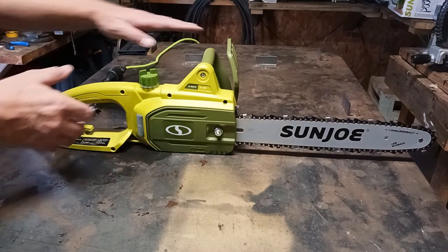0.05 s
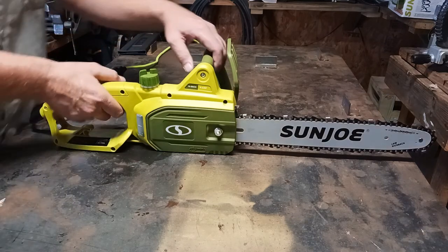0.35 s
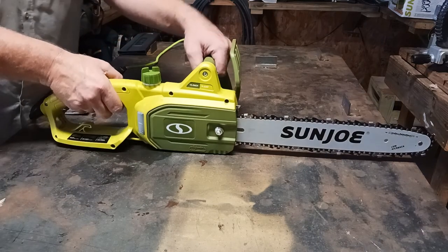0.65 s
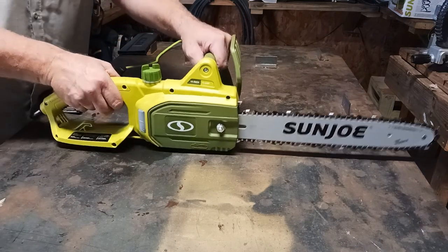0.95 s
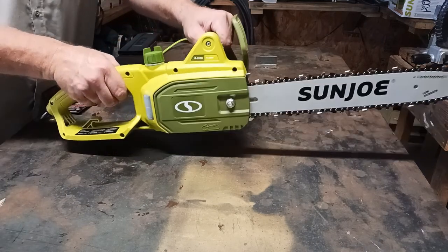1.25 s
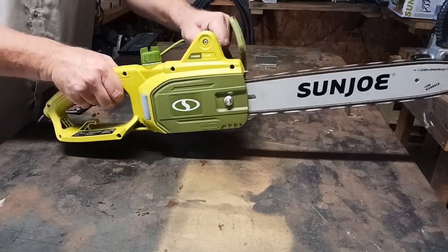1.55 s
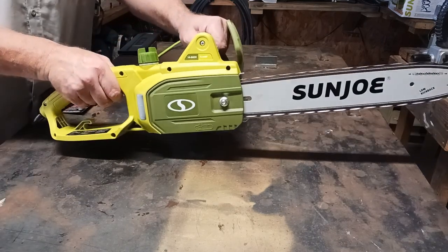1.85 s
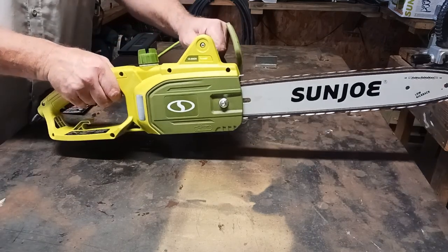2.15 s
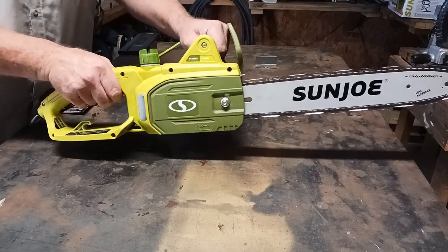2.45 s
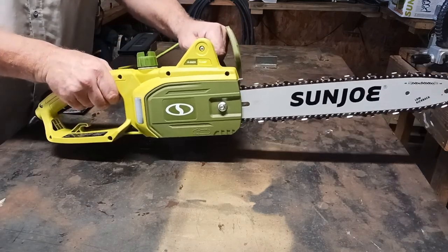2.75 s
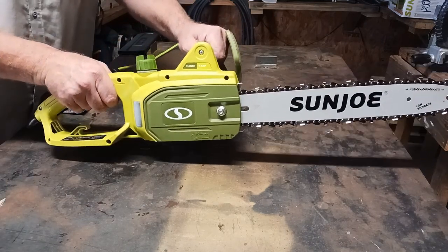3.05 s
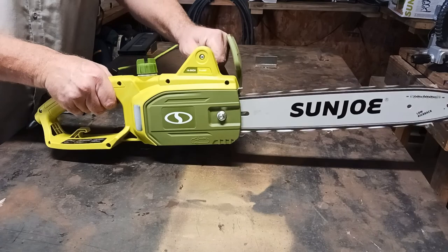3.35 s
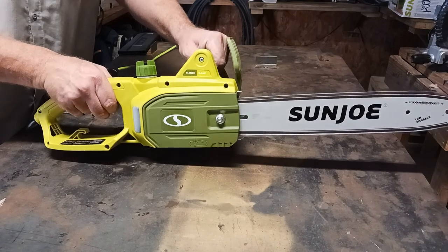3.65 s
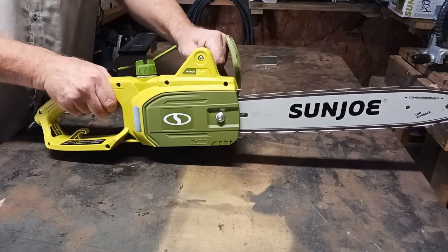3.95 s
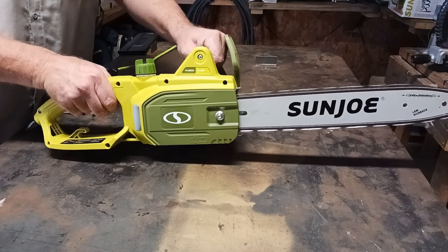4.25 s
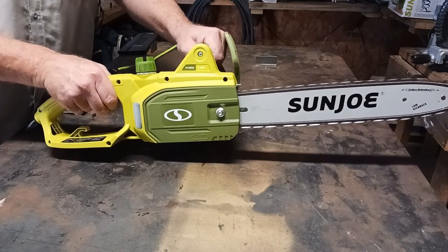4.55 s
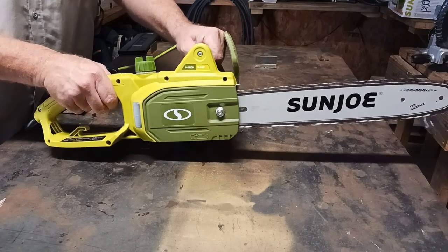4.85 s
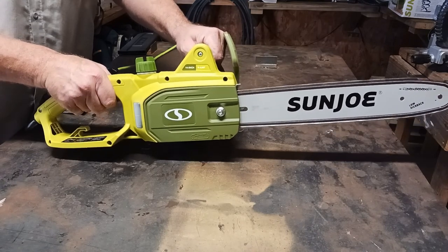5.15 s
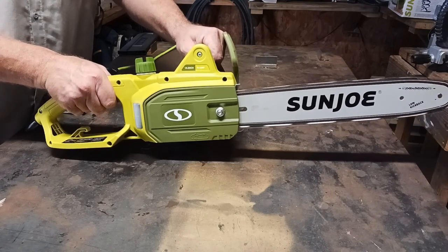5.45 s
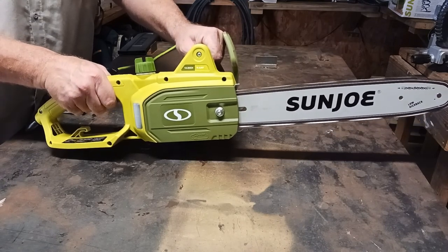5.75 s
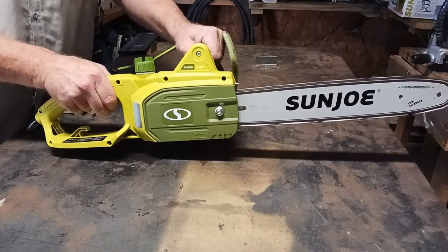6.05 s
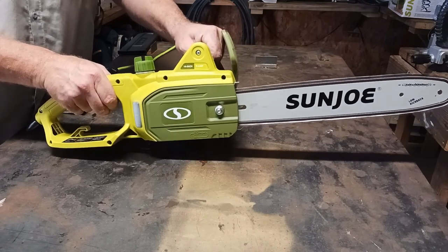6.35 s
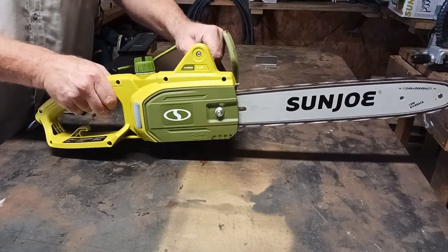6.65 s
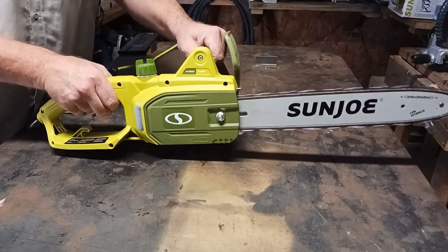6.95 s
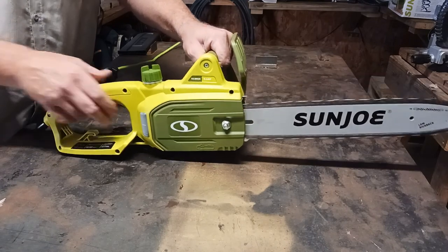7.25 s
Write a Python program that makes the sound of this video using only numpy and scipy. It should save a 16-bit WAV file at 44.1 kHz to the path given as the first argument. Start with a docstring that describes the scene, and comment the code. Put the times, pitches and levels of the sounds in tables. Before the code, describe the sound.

For the first second, hands and sleeves brush faintly over a workbench and an electric chainsaw, with two dull bumps over a low room rumble. At about 1.5 seconds a sharp clack starts a very short burst of the saw, cutting nothing. The chain hums and rattles down in pitch, clicking around 2.4 seconds and stopping near 3. At 3.3 a second, slightly longer burst snaps in, rises higher with a thin whistle and coasts down. At 5 seconds, before it stops, the saw spins up again, reaching its highest speed near 5.8 with a bright rattle and gear whine. Its draught buffets the close microphone on the right in low puffs from about 5.3 to 6.1. The pitch then sinks steadily, and around 7.3 seconds the still coasting saw touches the bench with a soft, low buzz. The workshop adds only short, dull reflections.

```python
"""Electric chainsaw, three blips

The saw is lifted off a workshop bench, blipped three times without cutting, and set down again.
Each blip spins the chain up and lets it coast: links hum on the sprocket and rattle along the bar,
ringing the housing. At top speed the gears whine, the saw whistles and its draught buffets the
right microphone port."""
import sys
import numpy as np
from scipy import signal
from scipy.fft import rfft, irfft
from scipy.io import wavfile

SR = 44100
rng = np.random.default_rng(int(sys.argv[2]) if len(sys.argv) > 2 else 0)


def output_pcm(signal):
    """Save a mono or channel-first signal as 16-bit PCM at the path in sys.argv[1].

    Samples are clipped to [-1, 1] before scaling.
    """
    pcm = np.clip(np.atleast_2d(signal).T, -1, 1) * 32767
    wavfile.write(sys.argv[1], SR, np.round(pcm).astype(np.int16))


N = 330750
T = np.arange(N) / SR
FREQS = np.maximum(np.fft.rfftfreq(N, 1 / SR), 1)

# room tone, low rumble and faint air: f/Hz, level/dB
RUMBLE_EQ = [(20, -42), (35, -27.5), (55, -5), (130, -5.5), (200, -22), (300, -20), (450, -34.5),
             (1000, -41)]
AIR_EQ = [(100, 16), (500, -2.5), (1500, 2.5), (3000, -32), (8000, -26), (12500, -14), (16000, 7.5)]
# bass resonances of the room: f/Hz, width/Hz, lift/dB
ROOM_MODES = [(68.3, 9.7, 22), (128, 33, 8.5)]
# two dull handling bumps, then a steady swell of low rumble before the first blip: t/s, hold/s, level/dB
RUMBLE_RISES = [(0.308, .03, -46), (0.62, 0.068, -45), (1.12, .45, -54.5)]
# sleeves and hands brush over bench and saw: t/s, hold/s, level/dB, treble offset/dB
BRUSHES = [(0.16, 0.17, -51.5, -1), (0.833, 0.059, -52, -5), (1.1, .32, -94, -2.5)]
# colour of the brushing and of the saw shifting on the bench: f/Hz, level/dB
BRUSH_EQ = [(120, -35), (200, -7), (311, -17), (387, -13), (671, -19.5), (950, -7), (1560, -5.5),
            (2130, -8.5), (6880, -9), (12600, -10), (16000, -14.5)]
SHIFT_EQ = [(120, 1), (200, 4), (320, 7), (430, -6), (560, -3), (750, -16), (1500, -29)]
# trigger clicks and chain snaps: t/s, level/dB, treble offset/dB
CLACKS = [(1.402, -49, -22), (1.46, -18, 2.5), (1.514, -6, 1.5), (2.363, -27, 9), (2.411, -27, 10),
          (2.425, -27, 4), (2.441, -22, 4), (2.475, -23, -1), (2.624, -21, 6), (3.306, -27, -3),
          (3.314, -16.5, 0), (3.523, -12, -6)]
# broad colour of chain and bar: f/Hz, level/dB
STEEL_EQ = [(60, -20.5), (160, -17), (250, -14.5), (330, 0), (450, -4.5), (700, 3.5), (1000, -3), (1600, 3),
            (3300, 6.5), (4700, 1), (5700, -5.5), (11000, -5), (13000, -1.5), (16000, -10)]
# resonances of housing and bar: f/Hz, width/Hz, lift/dB
HOUSING_MODES = [(353, 30, -8), (497.5, 24, 10.5), (557.5, 13, 14), (599.6, 33, 6), (668, 41, 4),
                 (784, 16, 0), (820, 33, 3.5), (980, 20, 1), (1115, 200, 9.5), (1178, 49, 7.5),
                 (1233.4, 26, 9), (1302, 130, 7.5), (1950, 130, 4), (3200, 80, 0), (4190, 83, 5.5),
                 (7280, 1700, 3.5), (8230, 560, -3.5), (9300, 220, 3.5)]
# blips of the trigger: pressed/s, released/s
BLIPS = [(1.458, 1.534), (3.318, 3.529), (5.045, 5.796)]
# the slack chain flaps against the bar: t/s, hold/s, extra knock/dB
FLAPS = [(2.237, 0.029, 1.5), (4.36, .05, 2)]
# harmonics 1-4 of the link rate: relative level at cruising speed/dB, rise per speed doubling/dB
LINK_HARMONICS = [(-8.5, 2), (1, -3), (-3.5, 1), (-20, 1)]
# how well the housing radiates a tone: f/Hz, level/dB
RADIATION = [(170, -26), (230, -19.5), (290, -14.5), (380, -13.5), (470, -6), (560, 4), (680, 0), (800, -1),
             (930, -6), (1060, -4.5), (1180, 4.5), (1300, -5), (1400, -12), (1600, -2), (2200, -24)]
# the strongest puffs of draught on the microphone: t/s, level/dB
PUFFS = [(3.51, -28), (5.356, -19), (5.464, -11), (5.59, -10.5), (5.68, -23), (5.801, -7.5), (5.882, -9.5),
         (6.04, -10.5)]
# colour of the draught: f/Hz, level/dB
DRAUGHT_EQ = [(20, -25.5), (50, -1), (100, -2), (180, -6.5), (300, -12.5), (600, -11.5), (1500, -48)]
# the coasting saw touches the bench: t/s, hold/s, f/Hz, level/dB
TOUCHES = [(7.29, .02, 107, -35), (7.407, 0.0092, 110, -37), (7.446, .045, 139, -41)]
# balance of the two microphone ports: f/Hz, left minus right/dB
PORT_BALANCE = [(100, 0.09), (380, -2.5), (700, -3.8), (1300, -1), (2400, 1.02), (4200, 1.7), (5000, 2.85),
                (6200, 0.4), (7600, -2), (8400, 2.84), (9200, 8.43), (11000, 6.5), (13000, 4.28),
                (16000, 4.83)]
# how alike the ports sound: f/Hz, correlation (0-1)
PORT_LIKENESS = [(60, 0.81), (300, 0.86), (650, 0.73), (1400, 0.34), (3000, 0.27), (6000, 0), (16000, 0)]

# chain speed is counted in drive links per second (Hz)
CRUISE_HZ, STOPPING_HZ = 200, 24  # reference speed for levels; speed below which the chain fades out
SPROCKET_TEETH, GEAR_ORDER = 7, 17  # links per sprocket turn; gear mesh cycles per link


def undb(db):
    """Decibels to gain."""
    return 10 ** (np.asarray(db) / 20)


def unit(x):
    """Scale to rms 1."""
    return x / np.sqrt(np.mean(x ** 2))


def unit_mid(pair):
    """Scale a stereo pair so that its centre has rms 1."""
    return pair / np.std(pair.mean(axis=0))


def curve(points, at=FREQS):
    """Read a table of values over frequency, on a log axis."""
    hz, value = np.transpose(points)
    return np.interp(np.log(at), np.log(hz), value)


def bells(modes):
    """EQ curve in dB with one bell per resonance."""
    return sum(db / (1 + (2 * (FREQS - hz) / width) ** 2) for hz, width, db in modes)


def ring(x, db):
    """Minimum-phase EQ: resonances ring on after each blow."""
    cepstrum = irfft(db * np.log(10) / 20, N)
    cepstrum[1:N // 2] *= 2
    cepstrum[N // 2 + 1:] = 0
    return irfft(rfft(x) * np.exp(rfft(cepstrum)), N)


def split(x, hz=5000):
    """Crossover: the lows and the highs of a sound."""
    low = irfft(rfft(x) / (1 + (FREQS / hz) ** 10), N)
    return low, x - low


def wander(rate_hz):
    """Smooth random modulation with rms 1."""
    knots = rng.standard_normal(N)
    return unit(np.interp(T * rate_hz, np.arange(N), knots))


def lag(x, seconds):
    """Follow a control with the given time constant."""
    keep = np.exp(-1 / (seconds * SR))
    return signal.lfilter([1 - keep], [1, -keep], x)


def stroke(start, hold, rise_db_per_s, fall_db_per_s):
    """Envelope that swells up to its start time, holds at 1, then dies away."""
    before, after = np.maximum(start - T, 0), np.maximum(T - start - hold, 0)
    return undb(-rise_db_per_s * before - fall_db_per_s * after)


def by_speed(hz, db, doubling_db):
    """Gain that is db at cruising speed and grows with each doubling of speed."""
    return undb(db + doubling_db * np.log2(hz / CRUISE_HZ))


def noise():
    """Two unrelated white noises."""
    return rng.standard_normal((2, N))


def burst(decay_s):
    """A dying spray of noise, different in each channel."""
    t = T[:SR // 2]
    return rng.standard_normal((2, len(t))) * np.exp(-t / decay_s)


def crackle(blows, decay_s):
    """Each blow sets off a short dying spray of noise."""
    return noise() * signal.lfilter([1], [1, -np.exp(-1 / (decay_s * SR))], blows)


def smear(x, tail):
    """Convolve a sound with a stereo tail."""
    return signal.fftconvolve(np.atleast_2d(x), tail, axes=1)[:, :N]


def ports(pair):
    """Two unrelated signals become left and right: alike in the bass, each with its own colour."""
    likeness = np.clip(curve(PORT_LIKENESS), -.99, .99)
    mid, side = rfft(pair) * np.sqrt([1 + likeness, 1 - likeness])
    sign = np.array([[1], [-1]])
    return irfft((mid + sign * side) * undb(sign * curve(PORT_BALANCE) / 2), N)


def room_tone(rumble_db=-60.5, wander_db=2, air_db=-76):
    """A low rumble in the workshop's modes, with two bumps and a steady swell, under faint air hiss."""
    rumble = unit_mid(ports(ring(noise(), curve(RUMBLE_EQ) + bells(ROOM_MODES))))
    air = unit_mid(ports(ring(noise(), curve(AIR_EQ))))
    rises = sum(undb(db) * stroke(s, hold, rise_db_per_s=200, fall_db_per_s=161)
                for s, hold, db in RUMBLE_RISES)
    bed = undb(rumble_db + wander_db * wander(17))
    return np.hypot(bed, rises) * rumble + undb(air_db) * air


def brushing(grain_db=0.5, rise_db_per_s=215, fall_db_per_s=135, lead_s=.028):
    """Cloth and hands brush over bench and saw; the fine hiss of each stroke leads its body."""
    friction = noise() * undb(grain_db * wander(250))
    body, hiss = map(unit_mid, split(ports(ring(friction, curve(BRUSH_EQ)))))
    out = 0
    for s, hold, db, treble_db in BRUSHES:
        out += undb(db) * stroke(s, hold, rise_db_per_s, fall_db_per_s) * body
        out += undb(db + treble_db) * stroke(s - lead_s, hold, rise_db_per_s, fall_db_per_s) * hiss
    return out


def grip(slide_db=-64, handle_hz=3000, shift_db=-53):
    """A palm slides onto the plastic handle, then the saw shifts on the bench."""
    palm = unit_mid(ports(ring(noise(), curve(BRUSH_EQ) + bells([(handle_hz, 1300, 9)]))))
    shift = unit_mid(ports(ring(noise(), curve(SHIFT_EQ))))
    palm *= stroke(start=.41, hold=.09, rise_db_per_s=200, fall_db_per_s=61.5)
    shift *= stroke(start=.535, hold=.056, rise_db_per_s=1528, fall_db_per_s=90)
    return undb(slide_db) * palm + undb(shift_db) * shift


def housing(force):
    """Blows and scrapes ring the steel and the housing, heard in stereo."""
    return ports(ring(force, curve(STEEL_EQ) + bells(HOUSING_MODES)))


def clacks(decay_s=0.002, body_db=-8, snap_db=-3):
    """The trigger clicks and the slack chain slaps the bar: a knock with a bright snap on top."""
    blows, snaps = np.zeros((2, N))
    for s, db, treble_db in CLACKS:
        blows[int(s * SR)] = undb(db + body_db)
        snaps[int(s * SR)] = undb(db + treble_db + snap_db)
    spray = burst(decay_s)
    body = split(smear(blows, spray))[0]
    snap = split(smear(snaps, spray), hz=7500)[1]
    return housing(body + snap)


def walls(x, t60_s=0.21, predelay_s=.004, wet_db=-11, dull_hz=4500):
    """Short, dull reflections of a cluttered room."""
    tail = burst(t60_s / np.log(1000)) * (T[:SR // 2] > predelay_s)
    tail /= np.sqrt(np.sum(tail ** 2) / 2)
    return undb(wet_db) * split(smear(x, tail), hz=dull_hz)[0]


def chain_speed(pull_hz_per_s=10883, back_emf_hz=77.76, no_load_hz=762.6,
                friction_hz_per_s=185, air_drag_hz=545.6, creep_hz=8):
    """The motor pulls while the trigger is held, less as it speeds up; friction and air brake it."""
    step = .001
    t = np.arange(0, N / SR, step)
    trigger = sum(np.clip((t - on) / step, 0, 1) * np.clip((off - t) / step, 0, 1) for on, off in BLIPS)
    hz, speeds = 1., []
    for pressed in trigger.tolist():
        pull = pressed * pull_hz_per_s * (1 - hz / no_load_hz) / (1 + hz / back_emf_hz)
        brake = friction_hz_per_s * (1 + (hz / air_drag_hz) ** 2) * hz / (hz + creep_hz)
        hz = max(hz + (pull - brake) * step, 1.)
        speeds.append(hz)
    return np.interp(T, t, speeds)


def chain_rattle(hz, links, scatter_db=2.0, tick_s=0.00061, tick_db=-4,
                 wobble_db=0.49, ripple_db=0.35, flutter_db=0.85, chatter_db=0.5):
    """Links knock on sprocket and nose and scrape along the bar, brighter with speed."""
    # the chain tightens once per sprocket turn
    tension = undb(wobble_db * np.sin(2 * np.pi * links / SPROCKET_TEETH) + flutter_db * wander(45))
    scrape = noise() * undb(ripple_db * np.cos(2 * np.pi * 2 * links))
    # two rivets per drive link, each seating with its own force
    seats = np.diff(np.floor(2 * links), prepend=0) > 0
    blows = seats * undb(scatter_db * rng.uniform(-2, 2, N))
    force = tension * (unit(scrape) + undb(tick_db) * unit(crackle(blows, tick_s)))
    body, hiss = split(housing(force))
    knock, clatter = split(body, hz=925)
    bar, rattle = split(clatter, hz=1580)
    # the flapping chain strikes the bar in short spells, which its lower resonances answer most
    flaps_db = sum(db * stroke(s, hold, rise_db_per_s=295, fall_db_per_s=128.5) for s, hold, db in FLAPS)
    chatter = undb(chatter_db * wander(70) + flaps_db)
    return (by_speed(hz, db=-28.5, doubling_db=4.5) * unit_mid(knock * chatter)
            + by_speed(hz, db=-27, doubling_db=5.5) * unit_mid(bar * chatter)
            + by_speed(hz, db=-25, doubling_db=6) * unit_mid(rattle)
            + by_speed(hz, db=-21, doubling_db=8) * unit_mid(hiss))


def link_hum(hz, links, slack_rad=0.4, waver_db=2.5, whip_db=3, stall_hz=128, settle_s=.03):
    """The chain rides the sprocket's corners: harmonics of the link rate, blurred by slack."""
    taut = lag(1 / (1 + (stall_hz / hz) ** 10), settle_s)  # a slow chain only rattles
    doublings = np.log2(hz / CRUISE_HZ)
    tones = [(k, db + rise_db * doublings) for k, (db, rise_db) in enumerate(LINK_HARMONICS, 1)]
    # flat out the chain whips once per sprocket turn, adding a sideband above the second harmonic
    whip = (2 + 1 / SPROCKET_TEETH, whip_db + 80 * np.log10(hz / hz.max()))
    hum = 0
    for k, db in [*tones, whip]:
        phase = 2 * np.pi * k * links + slack_rad * (wander(90) + k * wander(12))
        gain = undb(db + curve(RADIATION, at=k * hz) + waver_db * wander(35))
        hum += np.sqrt(2) * gain * np.sin(phase)
    pan = undb([[-1.8], [1.6]])
    return taut * by_speed(hz, db=-25.5, doubling_db=3.5) * hum * pan


def cutter_ticks(hz, per_second=30, tick_db=-19, scatter_db=3, ring_s=.0009, slack_hz=190):
    """The slowing chain goes slack and single cutters tick on the bar, harder the faster they travel."""
    hits = rng.random(N) < per_second / SR
    blows = hits * undb(scatter_db * np.clip(rng.standard_normal(N), -2, 2))
    ticks = split(ports(crackle(blows, ring_s)), hz=8000)[1]
    slack = 1 / (1 + (hz / slack_hz) ** 2)
    return undb(tick_db) * hz / CRUISE_HZ * slack * ticks


def gears(hz, links, blur_rad=.6):
    """Near top speed the gear mesh whines and the sprocket's imbalance throbs."""
    mesh_phase = 2 * np.pi * GEAR_ORDER * links
    whine = np.array([np.sin(mesh_phase + blur_rad * wander(240)) * undb(3.3 * wander(34))
                      for _ in range(2)])
    throb = np.sin(2 * np.pi * links / SPROCKET_TEETH) * undb(3.6 * wander(9.9))
    return by_speed(hz, db=-46, doubling_db=15) * whine + by_speed(hz, db=-80, doubling_db=34) * throb


def whistle(hz, limit_hz=5330, flat_hz=1020, blur_hz=38, level_db=-21, weak_db=-15, waver_db=3.2,
            onset_hz=340, bend_hz=105, best_hz=440, range_hz=60):
    """A thin, unsteady whistle at high chain speeds; its pitch climbs with speed towards a limit."""
    pitch = limit_hz - flat_hz * np.exp(np.minimum((onset_hz - hz) / bend_hz, 1))
    phase = 2 * np.pi * np.cumsum(pitch + blur_hz * wander(300)) / SR
    sweet_spot = np.exp(-((hz - best_hz) / range_hz) ** 4)
    weak_tone = undb(weak_db) / (1 + (onset_hz / hz) ** 20)
    gain = (sweet_spot + weak_tone) * undb(level_db + waver_db * wander(40))
    pan = undb([[2.1], [-2.1]])
    return np.sqrt(2) * gain * np.sin(phase) * pan


def draught(hz, buffet_db=3, gust_db=3, flat_out_db=-19, doubling_db=44, left_db=-15):
    """Air thrown off the saw grows steeply with speed and buffets the right port in ragged puffs."""
    air = ring(noise() * undb(buffet_db * wander(150)), curve(DRAUGHT_EQ))
    flow = undb(flat_out_db + doubling_db * np.log2(hz / hz.max()) + gust_db * wander(22))
    puffs = sum(undb(db) * stroke(s, 0, rise_db_per_s=420, fall_db_per_s=400) for s, db in PUFFS)
    return unit(air) * np.hypot(flow, puffs) * undb([[left_db], [0]])


def bench_drone(bounce=0.61, waver_db=1.8):
    """Set down still coasting, the saw makes the bench top drone; it bounces on every second cycle."""
    drone = 0
    for s, hold, hz, db in TOUCHES:
        contact = undb(db) * stroke(s, hold, rise_db_per_s=450, fall_db_per_s=217)
        drone += contact * np.sin(2 * np.pi * hz * T) * (1 + bounce * np.sin(np.pi * hz * T))
    pan = undb([[-1.5], [1.5]])
    return np.sqrt(2) * drone * undb(waver_db * wander(50)) * pan


def gain_control(x, threshold_db=-17, slope=0.77, attack_s=0.04, recover_db_per_s=1):
    """Ducks quickly when the sound above the bass gets loud, and recovers very slowly."""
    above_bass = split(x, hz=400)[1]
    power = lag(np.mean(above_bass ** 2, axis=0), attack_s)
    duck_db = slope * np.maximum(10 * np.log10(power + 1e-18) - threshold_db, 0)
    recovery_db = recover_db_per_s * T
    return x * undb(recovery_db - np.maximum.accumulate(duck_db + recovery_db))


def scene(take_up_s=0.0053, lowering_s=(6.78, 7.43), lowered_db=3.5):
    """The trigger sets the chain's speed, which drives the moving parts; handling and room sit below."""
    hz = chain_speed()
    links = np.cumsum(hz) / SR
    rattle_hz = np.maximum(lag(hz, take_up_s), 1)  # the rattle builds just behind the speed
    moving = 1 / (1 + (STOPPING_HZ / rattle_hz) ** 3)
    parts = (chain_rattle(rattle_hz, links) + cutter_ticks(rattle_hz)
             + link_hum(hz, links) + gears(hz, links))
    saw = moving * parts + whistle(hz) + clacks()
    saw *= undb(np.interp(T, lowering_s, (0, lowered_db)))  # the nearing bench throws the sound back
    return saw + walls(saw) + draught(hz) + brushing() + grip() + bench_drone() + room_tone()


def record(dry, ceiling=.85, top_hz=15900):
    """The recorder rides its gain, rounds the very loudest peaks and cuts the top."""
    held = gain_control(dry)
    rounded = held / (1 + (held / ceiling) ** 4) ** (1 / 4)
    return signal.sosfilt(signal.ellip(10, .2, 75, top_hz, fs=SR, output="sos"), rounded)


dry = scene()
out = record(dry)
output_pcm(out)
```